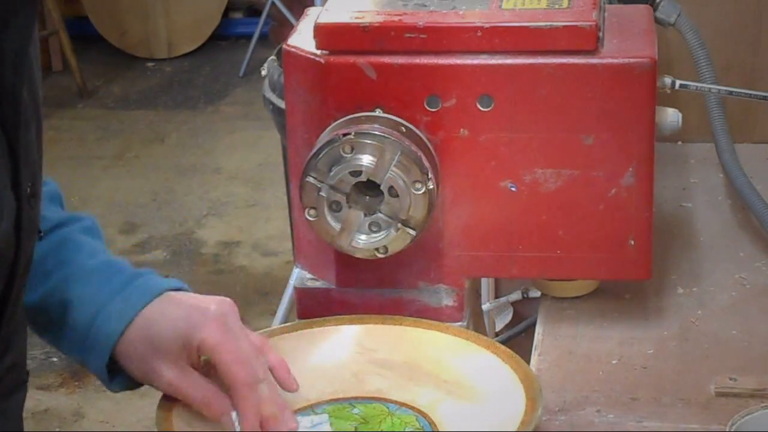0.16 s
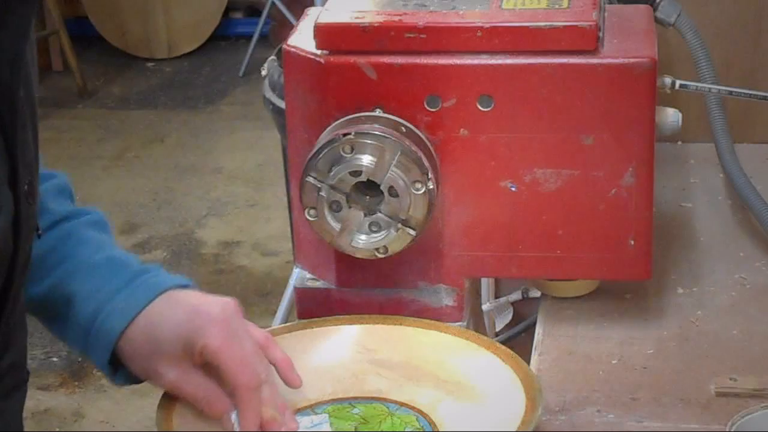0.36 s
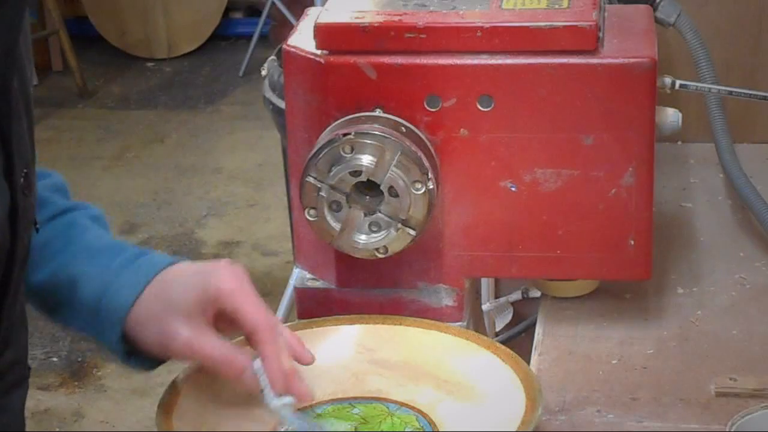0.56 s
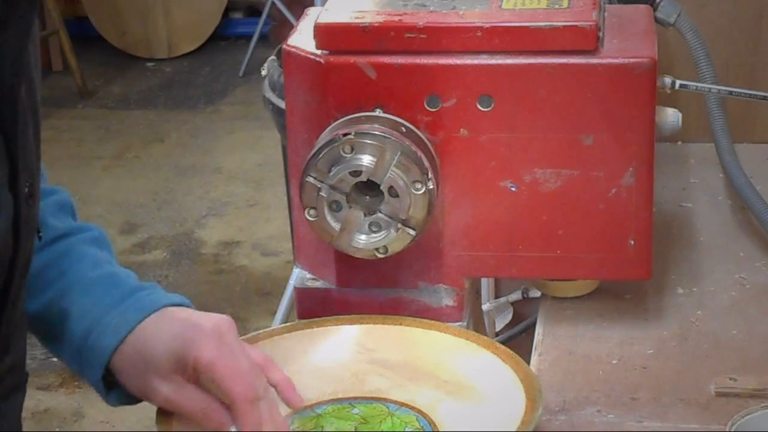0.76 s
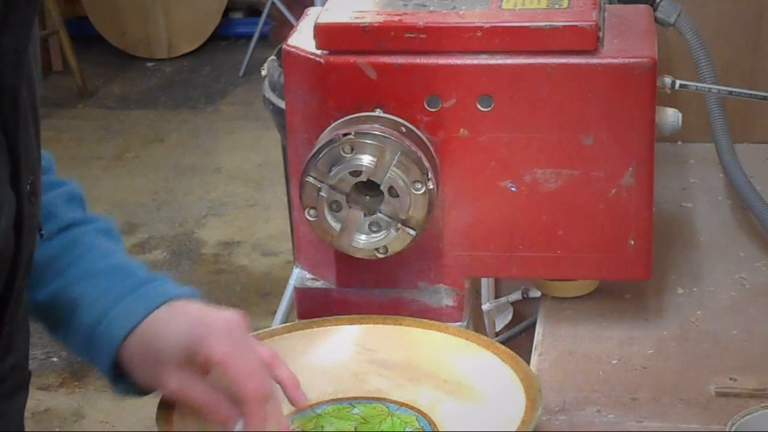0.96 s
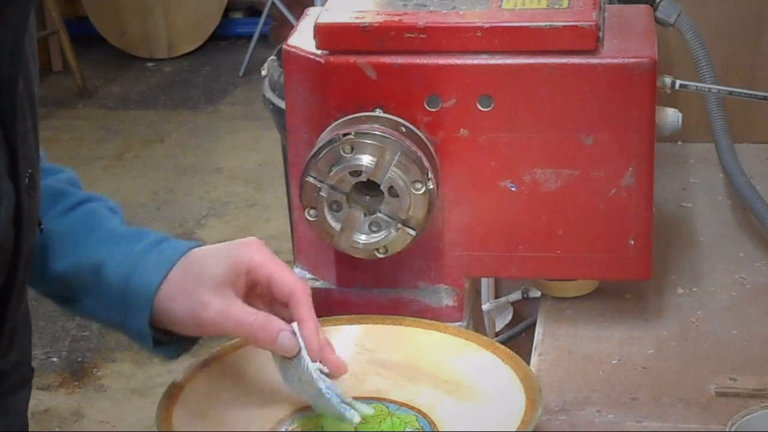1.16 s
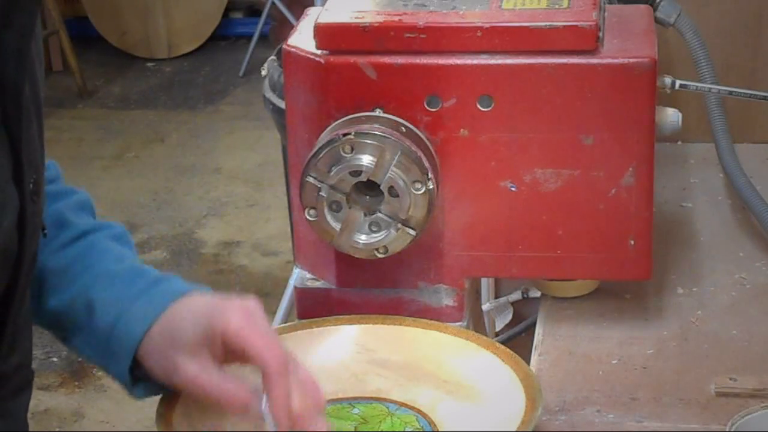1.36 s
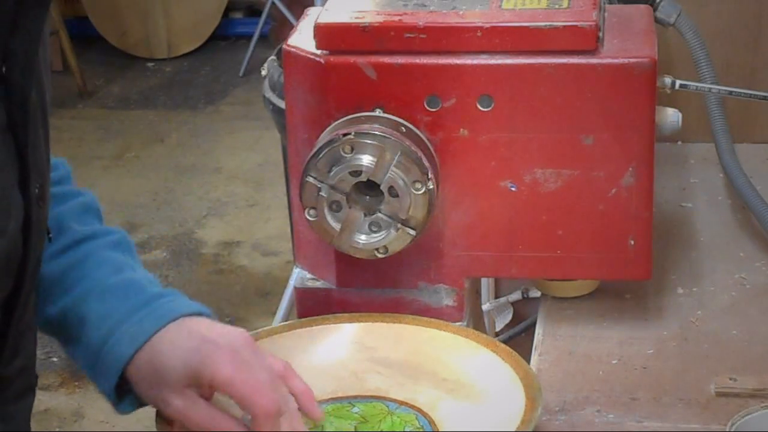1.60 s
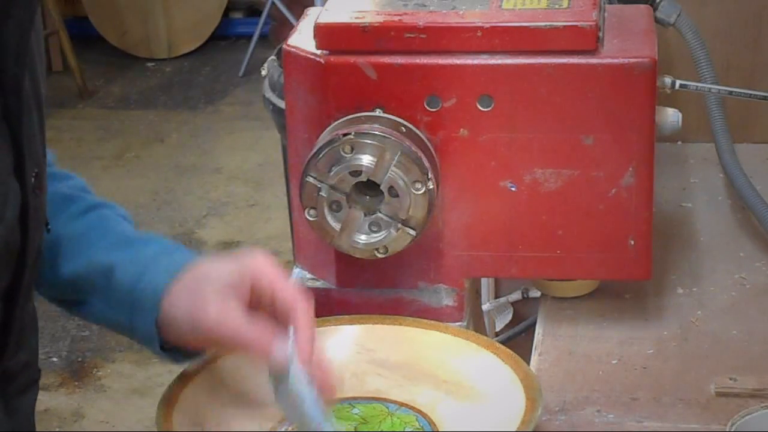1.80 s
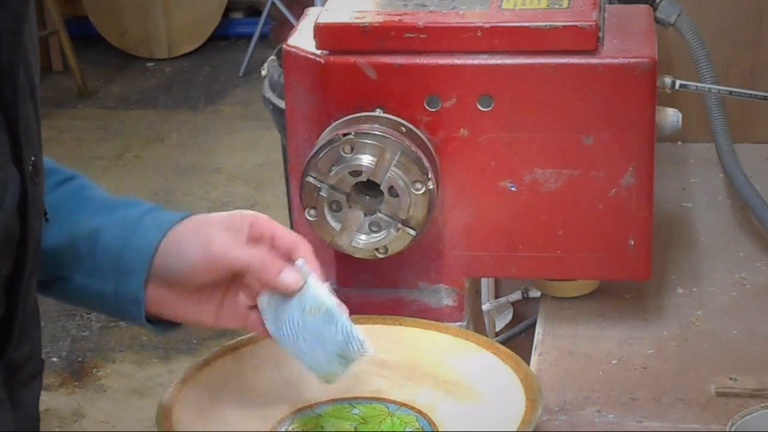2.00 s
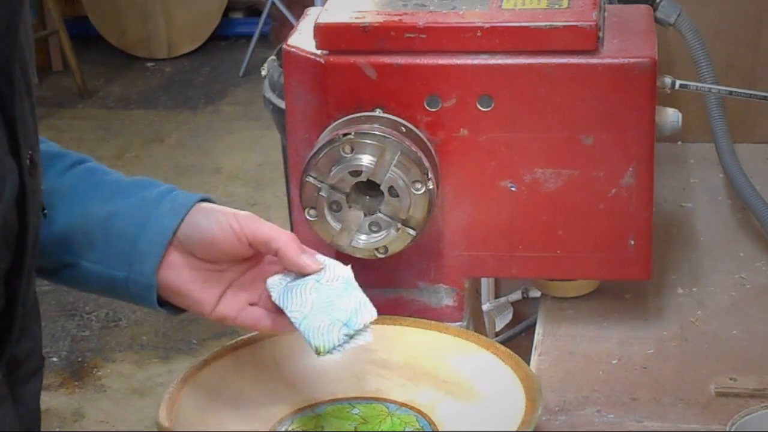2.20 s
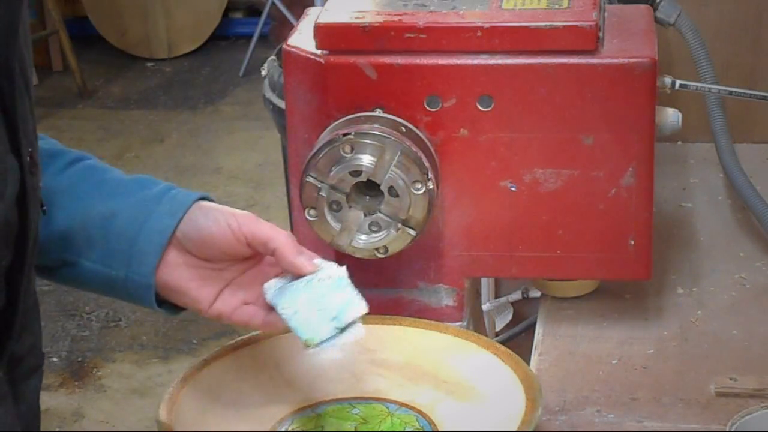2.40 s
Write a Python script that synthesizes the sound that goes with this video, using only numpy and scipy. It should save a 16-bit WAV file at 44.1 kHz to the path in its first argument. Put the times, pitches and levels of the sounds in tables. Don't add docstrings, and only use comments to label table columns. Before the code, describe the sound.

Hollow, muffled wooden bowl taps at uneven intervals, with dry paper towel rustles and tiny snaps, end in a strong knock and then near quiet. Recorded close in a dull workshop with faint hum and distant bird notes.

```python
import sys
import numpy as np
from scipy import signal
from scipy.fft import rfft, irfft
from scipy.io import wavfile
from scipy.ndimage import uniform_filter1d

SR = 44100
rng = np.random.default_rng(int(sys.argv[2]) if len(sys.argv) > 2 else 0)


def to_linear_factor(level_db):
    exponent = np.asarray(level_db, float) / 20
    return 10 ** exponent


def wav_out(sig):
    wavfile.write(sys.argv[1], SR, np.round(np.clip(np.atleast_2d(sig).T, -1, 1) * 32767).astype(np.int16))


N = 108000


def rms_one(x):
    return x / np.sqrt(np.mean(x ** 2) + 1e-20)


def at_hz(points, hz):
    points = np.array(points)
    return np.interp(np.log(hz), np.log(points[:, 0]), points[:, 1])


def drift(rate):
    pole = np.exp(-80 * np.pi * rate / SR)
    chance = rng.standard_normal(N // 40 + 2002)
    slow = signal.lfilter([1], [1, -2 * pole, pole * pole], chance)[2000:]
    return np.interp(np.arange(N) / 40, np.arange(len(slow)), rms_one(slow))


def ring(clicks, hz, t60):
    r, w = to_linear_factor(-60 / (t60 * SR)), 2 * np.pi * hz / SR
    return signal.lfilter([0, np.sin(w)], [1, -2 * r * np.cos(w), r * r], clicks + 1e-18)


def soft_ring(clicks, hz, t60, rise_t60):
    return ring(clicks, hz, t60) - ring(clicks, hz, rise_t60)


def low(x, hz):
    return signal.sosfilt(signal.butter(2, min(hz, .45 * SR), fs=SR, output="sos"), x)


def high(x, hz, order=2):
    return signal.sosfilt(signal.butter(order, hz, "high", fs=SR, output="sos"), x)


def band_noise(low_hz, high_hz):
    sos = signal.butter(2, [low_hz, high_hz], "band", fs=SR, output="sos")
    return signal.sosfilt(sos, rng.standard_normal(N))


def coloured(spectrum):
    hz = np.arange(1, N // 2 + 2) * SR / N
    inside = (hz >= spectrum[0][0]) & (hz < spectrum[-1][0])
    return rms_one(irfft(rfft(rng.standard_normal(N)) * to_linear_factor(at_hz(spectrum, hz)) * inside, N))


def swell(t, peak, rise, fall):
    return np.exp(-np.maximum((peak - t) / rise, (t - peak) / fall))


# f/Hz, level/dB
MAINS = [(100, -75), (200, -79), (300, -71), (400, -64.5), (500, -80), (600, -80.5)]
# f/Hz, level/dB
LAMPS = [(7838, -76), (7897, -75), (12000, -79)]


def hum():
    t = np.arange(N) / SR
    return sum(np.sqrt(2) * to_linear_factor(db) * np.sin(2 * np.pi * (hz * t + rng.random())) for hz, db in MAINS + LAMPS)


# t/s, level/dB
MOTOR_LEVEL = [
    (0, -87),
    (.6, -72),
    (.9, -70.5),
    (1.6, -68),
    (2.45, -68.5),
]


def motor():
    t = np.arange(N) / SR
    return np.sqrt(2) * to_linear_factor(np.interp(t, *np.transpose(MOTOR_LEVEL))) * np.sin(2 * np.pi * 552 * t)


# f/Hz, density/dB per Hz
RUMBLE_COLOUR = [(25, -28), (45, -18), (100, -2.5), (150, -9.5), (250, -14.5), (450, -5), (700, -5.5),
                 (1000, -7.5)]
# f/Hz, density/dB per Hz
HISS_COLOUR = [(590, -56), (1000, -0.5), (1220, -0.5), (1480, -2), (3390, -1.5), (4200, 0.5), (4700, -5),
               (5620, -6.5), (14600, -10)]


def room_tone():
    hiss = to_linear_factor(-56 + 0.15 * drift(0.9)) * coloured(HISS_COLOUR)
    return hiss + to_linear_factor(-66) * coloured(RUMBLE_COLOUR)


# peak t/s, level/dB, rise/s, fall/s, brightness/dB
CRINKLES = [(0.174, -55.5, 0.033, 0.014, -5.5), (0.188, -52, 0.0041, 0.011, -20),
            (.40, -62.5, 0.022, 0.032, -21.5), (0.474, -49, 0.013, 0.008, -2.5),
            (0.488, -44.5, 0.0039, 0.018, -8.5), (0.547, -52.5, 0.0007, 0.023, -6),
            (0.626, -56.5, 0.0044, 0.017, -6), (0.701, -56, 0.018, 0.016, -5),
            (0.76, -46.5, 0.0055, 0.016, -5), (.82, -62, .01, 0.012, -10),
            (0.906, -59.5, 0.0017, 0.0063, -11.5), (1.032, -68, 0.0011, 0.0079, -8),
            (1.077, -43, 0.013, 0.0092, -1.3), (1.097, -53.5, 0.0088, 0.04, -2),
            (1.138, -50.5, 0.0033, 0.0091, 2.5), (1.164, -68, .003, 0.03, -5),
            (1.343, -59.5, 0.0032, 0.0098, 1), (1.384, -62, 0.006, .01, -6),
            (1.429, -56.5, 0.032, 0.051, -4), (1.56, -57.5, 0.015, 0.015, -4),
            (1.67, -59.5, 0.021, .015, -2), (1.779, -50.5, 0.03, 0.022, -1),
            (1.826, -50.5, 0.0075, 0.013, -0.5), (2.057, -64.5, 0.029, 0.032, -8),
            (.04, -66, 0.095, 0.13, 1),
    (1.61, -60, .01, 0.0063, -8),
    (1.859, -80, 0.0068, 0.015, -24),
]
# f/Hz, level/dB
PAPER_COLOUR = [(900, -37.5), (1800, -8), (2800, -3.5), (3900, 3.5), (4900, 4), (5800, -0.5), (8000, -2.5),
                (13000, -12.5)]
# f/Hz, level/dB, t60/s
FOLDS = [(1930, -14, 0.084), (3926, -8.5, 0.058), (4516, -8, 0.026), (4814, -4.5, 0.026),
         (6770, -10, 0.0059)]


def paper():
    grains_per_s, grain_spread_db, grain_cycles = 14000, 2.5, 22.0
    t, out = np.arange(N) / SR, np.zeros(N)
    struck = rng.random(N) < grains_per_s / SR
    sizes = to_linear_factor(grain_spread_db * np.minimum(rng.exponential(1, N), 5))
    grains = struck * sizes * rng.choice([-1, 1], N)
    moves = CRINKLES
    swells = np.array([swell(t, s, rise, fall) for s, _, rise, fall, _ in moves])
    _, db, _, _, tilt = np.transpose(moves)
    rustle = to_linear_factor(-68 + 1.5 * drift(12.0))
    dealt = rng.integers(0, 40, N)
    fibres = [(hz, at_hz(PAPER_COLOUR, hz) - 11, grain_cycles / hz) for hz in np.geomspace(900, 13500, 40)]
    for k, (hz, ring_db, t60) in enumerate(fibres + FOLDS):
        level = rustle + to_linear_factor(db + tilt * np.log2(hz / 4000)) @ swells
        mine = dealt % (40 if k < 40 else 5) == k % 40
        out += to_linear_factor(ring_db) * rms_one(ring(grains * mine, hz, t60)) * level
    return high(out, 740)


def shop(x):
    t60_s, wall_cut_hz = 0.41, 3800
    out, dull = np.zeros(N), np.exp(-2 * np.pi * wall_cut_hz / SR)
    for k, lag in enumerate((np.geomspace(.0113, .043, 12) * SR).astype(int)):
        loop, gain, state = x.copy(), to_linear_factor(-60 * lag / SR / t60_s), [0.]
        for i in range(lag, N, lag):
            back, state = signal.lfilter([gain * (1 - dull)], [1, -dull], loop[i - lag:i], zi=state)
            loop[i:i + lag] += back[:N - i]
        out += (loop - x) * (-1) ** k
    return out


# t/s, low f/Hz, high f/Hz, level/dB
SIDE_PATCHES = [(.53, 5600, 11700, -64), (.945, 8990, 10500, -70), (.995, 4220, 5210, -67),
                (2.225, 4700, 6300, -68), (.035, 12500, 13400, -81), (.145, 13800, 14500, -78),
                (.53, 13400, 14500, -79), (.67, 12800, 14500, -76), (.845, 13400, 14500, -79),
                (.945, 13200, 14600, -74), (1.325, 13400, 14500, -79), (1.425, 13300, 14500, -78),
                (2.19, 13200, 14500, -78), (2.38, 13400, 14500, -79)]


def patches():
    t, length_s = np.arange(N) / SR, .035
    out = np.zeros(N)
    for s, low_hz, high_hz, db in SIDE_PATCHES:
        gate = np.clip(2 - 4 * abs(t - s) / length_s, 0, 1)
        out += to_linear_factor(db) * coloured([(low_hz, 0), (high_hz, 0)]) * gate
    return out


# t/s, level/dB, brightness/dB per octave, place/-1 middle to 1 rim, turn/-1 to 1 around the bowl
KNOCKS = [(0.175, -29.5, -5.5, -0.26, 0.026), (0.1869, -26, 2, 0.7, 0.72), (0.212, -47, 3, 0.38, -0.28),
          (0.248, -55, 6, 0.67, 0.026), (0.3785, -29.5, 3, 0.59, 0.37), (0.391, -49, -8.5, 0.4, 0.43),
          (0.767, -39, -6.5, 0.41, 0.15), (0.787, -47, -8, 0.022, 0.16), (1.074, -48.5, 12.5, 0.012, 0.25),
          (1.341, -56, 3.5, -0.36, 0.48), (1.721, -20.5, 2, 0.31, -0.19), (1.7502, -29, -1.8, 0.14, 0.34),
          (1.767, -58, 8, .1, .4), (1.790, -48.5, 6, 0.34, 0.035)]


def knock_clicks(hz, rim_db=0, turn_db=0):
    s, db, tilt, place, turn = np.transpose(KNOCKS)
    train = np.full(N, 1e-18)
    bright_db = tilt * np.log2(max(hz, 420) / 1000)
    train[(s * SR).astype(int)] = to_linear_factor(db + bright_db + place * rim_db + turn * turn_db)
    return train


MODE_HZ = [342, 386, 495, 565, 615, 1105, 1180, 1291, 1530, 1790, 1940, 2082, 2250, 2585]
# level/dB, t60/s, gain towards the rim/dB, gain with the turn/dB
MODES = [(-19.5, 0.28, -16, 6), (-12, 0.21, 2.5, -11), (-7.5, 0.084, 5, 9.5), (0, 0.12, 4, -6),
         (-12.5, 0.04, 13, -4), (1.5, 0.077, -6, -7), (-2.5, 0.073, -4, 3.5), (-28, 0.46, 5.5, -3.5),
         (-3, 0.049, -7, -6.5), (-12.5, 0.094, 8, 2.5), (-22, 0.064, -15, -4), (-0.5, 0.05, -10.5, -3),
         (-18, 0.033, 8.5, 12), (-12, 0.081, -14, -10)]
# f/Hz, level/dB, t60/s, gain towards the rim/dB
POK = [(527, -4.5, 0.056, 11), (1162, -15, 0.056, -13.5), (2130, -8, 0.015, 16)]


def bowl_modes():
    out = np.zeros(N)
    modes = [(hz, *mode) for hz, mode in zip(MODE_HZ, MODES)]
    poks = [(*pok, 0) for pok in POK]
    for hz, db, t60, rim_db, turn_db in modes + poks:
        rise_t60 = max(.004, 4.5 / hz)
        out -= to_linear_factor(db) * soft_ring(knock_clicks(hz, rim_db, turn_db), hz, t60, rise_t60)
    out = high(out, 240)
    out = signal.lfilter(*signal.iirnotch(941, 5.2, fs=SR), out)
    return low(out, 3120)


# f/Hz, level/dB, t60/s
BENCH = [(333, -27.5, 0.33), (385, -24.5, 0.2), (560, -19.5, 0.2), (820, -28, 0.26), (1220, -30.5, 0.36),
         (1520, -28, 0.23), (2000, -32.5, 0.32), (3000, -21, 0.046)]


def bench():
    out, points = np.zeros(N), np.array(BENCH)
    rise = np.exp(-1 / (.007 * SR))
    for hz in np.geomspace(330, 3500, 18):
        band = band_noise(hz / 1.075, hz * 1.075)
        even = band / np.sqrt(uniform_filter1d(band ** 2, size=882))
        fall = to_linear_factor(-60 / (at_hz(points[:, ::2], hz) * SR))
        dying = signal.lfilter([1 - rise], np.convolve([1, -fall], [1, -rise]), knock_clicks(hz))
        out += to_linear_factor(at_hz(points, hz)) * even * dying
    return out


def crack():
    dying = signal.lfilter([1], [1, -np.exp(-1 / (0.015 * SR))], knock_clicks(1800))
    return to_linear_factor(-13.5) * band_noise(1800, 4940) * dying


def bowl():
    leg_hz, thump_hz, thump_t60_s = 237.7, 168, 0.032
    out = bowl_modes() + bench() + crack()
    out = signal.lfilter(*signal.iirnotch(720, 4.54, fs=SR), out)
    leg = soft_ring(knock_clicks(leg_hz), leg_hz, 0.35, 0.066)
    thump = soft_ring(knock_clicks(thump_hz), thump_hz, thump_t60_s, thump_t60_s / 2)
    return out + to_linear_factor(-30) * leg + to_linear_factor(-25) * thump


# peak t/s, level/dB, rise/s, fall/s, f/Hz
RUBS = [
    (0.191, -47, 0.0011, .011, 3490),
    (.194, -45.5, .001, 0.014, 4380),
    (0.383, -50, 0.0015, 0.018, 3730),
    (.768, -54, 0.013, .025, 1150),
    (1.165, -53.5, 0.0032, 0.0077, 1310),
    (1.342, -48, .0015, .012, 4990),
    (1.415, -56, .006, 0.0066, 4960),
    (1.426, -52, 0.0034, .015, 4940),
    (1.782, -53, 0.0054, .006, 4980),
    (2.5, -57, .005, 0.0053, 1290),
]


def rubs():
    t, out = np.arange(N) / SR, np.zeros(N)
    for s, db, rise, fall, hz in RUBS:
        tone = ring(rng.standard_normal(N), hz, .03)
        even = tone / np.sqrt(uniform_filter1d(tone ** 2, size=441) + 1e-9)
        out += to_linear_factor(db) * swell(t, s, rise, fall) * even
    return out


# t/s, f/Hz, level/dB
BIRD_UP = [
    (.212, 4060, -59),
    (.225, 4050, -56),
    (.245, 4220, -59),
    (.262, 4240, -66),
    (.28, 4240, -59),
    (.3, 4340, -57),
    (.316, 4400, -60),
]
# t/s, f/Hz, level/dB
BIRD_DOWN = [
    (1.875, 3680, -59),
    (1.89, 3674, -57),
    (1.93, 3710, -58),
    (1.944, 3680, -68),
    (1.954, 3590, -60),
    (1.967, 3720, -67),
    (1.982, 3560, -60),
    (2.005, 3620, -64),
    (2.045, 3520, -68),
]


def bird(note):
    t = np.arange(N) / SR
    s, hz, db = np.transpose(note)
    gate = np.clip(np.minimum(t - s[0], s[-1] - t) / .01, 0, 1)
    level = to_linear_factor(np.interp(t, s, db) + 1.5 * drift(42))
    pitch_hz = np.interp(t, s, hz) + 10.0 * drift(53)
    return np.sqrt(2) * gate * level * np.sin(2 * np.pi * np.cumsum(pitch_hz) / SR)


# t/s, level/dB, fall/s
SNAPS = [(.4693, -48, .002), (0.4885, -40, .0015), (.4912, -37, .002), (0.5484, -46, .002),
         (.623, -49, .002), (.7587, -57, 0.0018), (1.071, -45, .002), (1.0765, -46, 0.0018),
         (1.136, -51, 0.0026), (1.771, -57, 0.0017), (1.81, -43, 0.0034), (1.826, -56, 0.0028)]


def snaps():
    t = np.arange(N) / SR
    bright = low(high(rng.standard_normal(N), 3000, order=1), 10500)
    return bright * sum(to_linear_factor(db) * (t >= s) * np.exp(-abs(t - s) / fall) for s, db, fall in SNAPS)


def scene():
    near = bowl() + paper() + rubs() + snaps()
    far = bird(BIRD_UP) + bird(BIRD_DOWN) + hum() + motor() + room_tone()
    mid = near + to_linear_factor(-31.5) * shop(near) + far
    return mid + patches() * np.array([[1], [-1]])


def low_pass(x):
    return signal.sosfilt(signal.butter(12, 14720, fs=SR, output="sos"), x)


def record(dry):
    top, cutoff_hz = .4, 14790
    rounded = top * np.tanh(dry / top)
    mix = signal.sosfilt(signal.cheby2(16, 60, cutoff_hz, fs=SR, output="sos"), rounded)
    return low_pass(mix)


dry = scene()
out = record(dry)
wav_out(out)
```